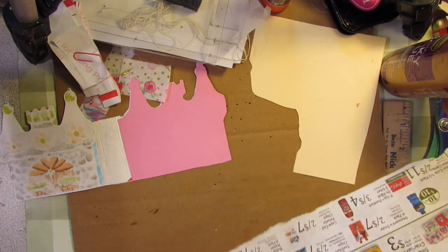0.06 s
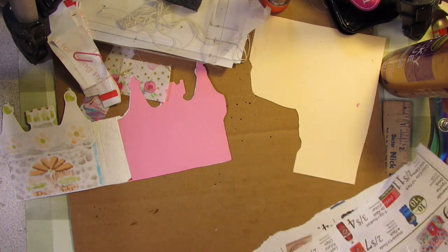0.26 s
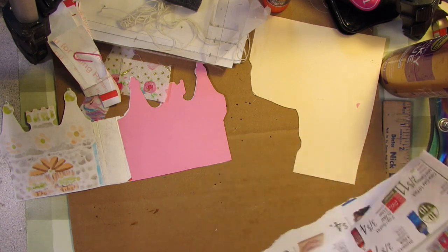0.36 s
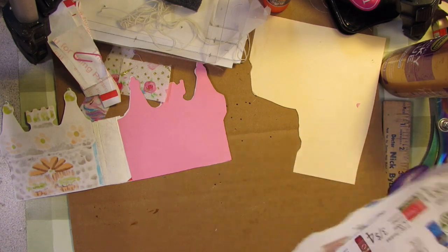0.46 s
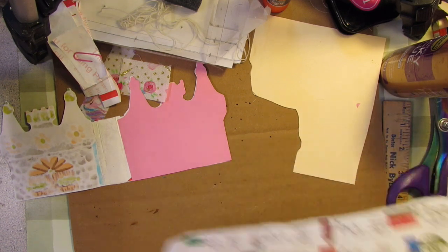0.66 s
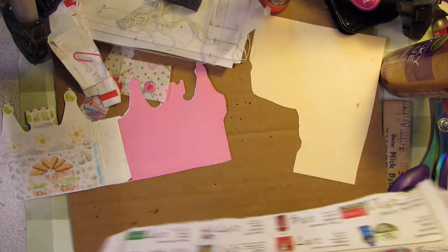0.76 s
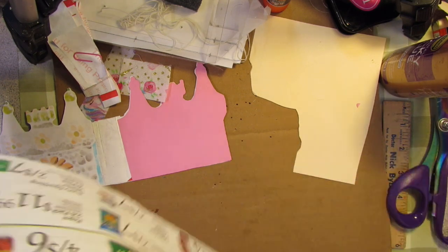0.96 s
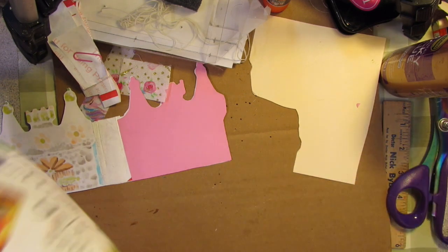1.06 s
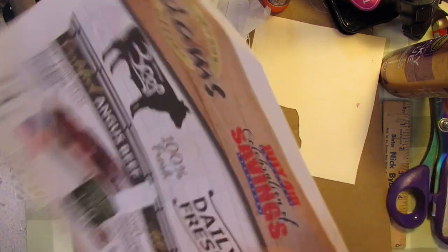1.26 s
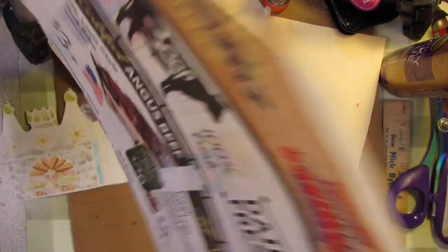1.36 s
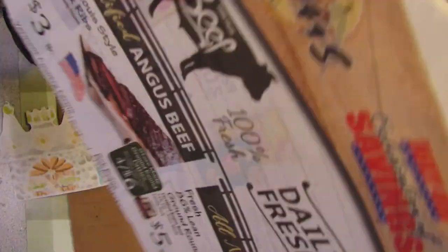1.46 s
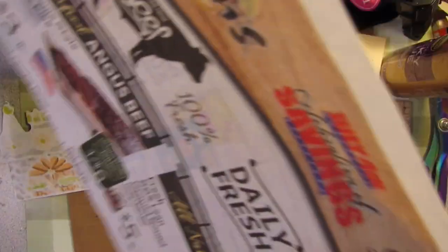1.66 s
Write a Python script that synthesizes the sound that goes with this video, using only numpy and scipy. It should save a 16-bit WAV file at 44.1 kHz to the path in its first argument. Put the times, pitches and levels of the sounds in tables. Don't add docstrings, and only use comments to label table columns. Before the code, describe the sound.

Close, dry paper handling: soft sliding and small creaks first, then crisp snaps, crinkles and low flaps thickening into a dense burst, ending in a few faint ticks over quiet room hiss.

```python
import sys
import numpy as np
from scipy import signal
from scipy.fft import rfft, irfft, next_fast_len
from scipy.io import wavfile

SR = 44100
rng = np.random.default_rng(int(sys.argv[2]) if len(sys.argv) > 2 else 0)


def ratio(d):
    e = np.asarray(d, float) / 20
    return 10 ** e


def log_audio(samples):
    frames = np.atleast_2d(samples).T
    limited = np.clip(frames, -1, 1)
    pcm = np.round(limited * 32767).astype(np.int16)
    wavfile.write(sys.argv[1], SR, pcm)


N = 74970
BUCKLE_RISE_S, BUCKLE_FALL_S = 0.0015, 0.0045


def rms_one(x):
    return x / np.sqrt(np.mean(x ** 2) + 1e-20)


def at_hz(points, hz):
    table_hz, values = np.array(points).T
    return np.interp(np.log(hz), np.log(table_hz), values)


def colour(x, points):
    size = next_fast_len(N + 8192)
    hz = np.arange(size // 2 + 1) * SR / size + 1
    return irfft(rfft(x, size) * ratio(at_hz(points, hz)), size)[..., :N]


def drift(rate_hz):
    r = np.exp(-2 * np.pi * rate_hz / SR)
    wander = signal.lfilter([1], [1, -2 * r, r * r], rng.standard_normal(N + SR))
    return rms_one(wander[SR:])


def band(x, hz, q):
    b, a = signal.iirpeak(hz, q, fs=SR)
    return signal.lfilter(b, a, signal.lfilter(b, a, x))


def high_pass(x, hz):
    return signal.sosfilt(signal.butter(2, hz, "high", fs=SR, output="sos"), x)


def grains(per_s, spread_db):
    sizes = ratio(spread_db * np.minimum(rng.exponential(1, N), 5)) * rng.choice([-1, 1], N)
    return rms_one(sizes * (rng.random(N) < per_s / SR))


def add(out, s, x):
    i = int(s * SR)
    out[i:i + len(x)] += x[:len(out) - i]


def bursts(rows, source, q, rise_s, fall_s, other_db, other_ratio):
    out, t = np.zeros(N), np.arange(6000) / SR
    source = np.concatenate([source, source[:6000]])
    mode_ratios = rng.uniform(0.696, 1.4, (len(rows), 2))
    mode_db, mode_width_hz = -10, 170
    for (s, length, db, hz), ratios in zip(rows, mode_ratios):
        fall = np.exp(-np.maximum(t - length + fall_s / 2, 0) / fall_s)
        gate = np.clip(t / rise_s, 0, 1) * fall
        piece = gate * source[int(s * SR):][:6000]
        panel = rms_one(band(piece, hz, q))
        other = rms_one(band(piece, other_ratio * hz, 1.1))
        modes = sum(rms_one(band(piece, hz * m, hz * m / mode_width_hz)) for m in ratios)
        whole = panel + ratio(other_db) * other + ratio(mode_db) * modes
        add(out, s, ratio(db) * np.sqrt(np.mean(gate ** 2)) * whole)
    return out


def hush():
    # f/Hz, level/dB
    tone_colour = [(30, -55), (100, -11), (300, -3.5), (520, -7), (700, -20.5), (2000, -20), (8000, -26),
                   (16000, -41)]
    # f/Hz, side minus mid level/dB
    tone_width = [(60, 15), (300, 4), (1400, 7.5), (3000, 7), (7000, -21), (15000, 7)]
    mid, side = colour(rng.standard_normal((2, N)), tone_colour)
    level = ratio(-66.5) / np.std(mid)
    return level * (mid + colour(side, tone_width) * [[1], [-1]])


def room(x):
    t60_s, level_db, wall_cut_hz = 0.24, -16, 3500
    tails = rng.standard_normal((2, 12000)) * ratio(-60 * np.arange(12000) / SR / t60_s)
    tails = tails / np.sqrt(np.sum(tails ** 2, axis=1, keepdims=True))
    r = np.exp(-2 * np.pi * wall_cut_hz / SR)
    late = np.pad(signal.lfilter([1 - r], [1, -r], tails), ((0, 0), (250, 0)))
    return ratio(level_db) * signal.fftconvolve(x[None], late, axes=1)[:, :N]


def slide():
    # t/s, level/dB, brightness/(dB per octave)
    strokes = [(0, -59.5, 4), (.042, -71, -1), (0.101, -60.5, 0), (.2, -66.5, 2.5), (.212, -49.5, 0),
               (0.253, -40, 2.5), (0.302, -53, 1.1), (0.441, -50, 0.5), (.55, -59.5, -6), (.7, -42.5, -0.9),
               (.775, -59.5, -4.5), (0.868, -44.5, -1.2), (1.002, -48, 0.5), (1.06, -59.5, -3),
               (1.09, -59.5, -0.5), (1.181, -38.5, 1), (1.271, -54.5, 3.3), (1.345, -78.5, 1)]
    # f/Hz, level/dB
    sheet_colour = [(300, -9.5), (800, -2.5), (2000, 1.5), (5000, 0.5), (9000, -2.5), (13000, -10.5),
                    (16000, -22)]
    s, stroke_db, stroke_tilt = np.transpose(strokes)
    t = np.arange(N) / SR
    db, tilt = np.interp(t, s, stroke_db), np.interp(t, s, stroke_tilt)
    out, shared, patchy_db = 0, drift(25), 3.0
    fibres = [grains(per_s=11000, spread_db=2.5) for _ in range(2)]
    for k, low in enumerate(300 * 2 ** np.arange(0, 6, 0.5)):
        half_octave = signal.butter(2, [low, low * 2 ** 0.5], "band", fs=SR, output="sos")
        part = signal.sosfilt(half_octave, fibres[k % 2])
        bright_db = tilt * np.log2(low / 3400)
        flicker_db = patchy_db * (0.5 * shared + drift(8.8))
        out = out + part * ratio(at_hz(sheet_colour, low * 2 ** 0.26) + bright_db + flicker_db)
    return ratio(db + 6.0) * out


def flaps():
    # t/s, length/s, level/dB, centre f/Hz
    flap_rows = [(.052, 0.012, -58.5, 534), (.22, 0.021, -54.5, 246), (.215, 0.014, -61.5, 102),
                 (.53, 0.03, -61, 145), (.6, 0.036, -59.5, 130), (.78, 0.024, -64, 251),
                 (.94, 0.011, -66, 165), (.43, 0.011, -53.5, 364), (.46, 0.0062, -49.5, 464),
                 (.575, 0.013, -42.5, 304), (.61, 0.028, -46, 298), (.69, 0.037, -48.5, 430),
                 (.815, 0.0085, -35, 407), (.85, 0.035, -52.5, 450), (.875, 0.024, -39, 484),
                 (.99, 0.01, -42, 438), (1.118, 0.0032, -35.5, 500), (1.145, 0.045, -40.5, 341),
                 (1.19, 0.054, -48, 290), (1.288, 0.014, -45, 382)]
    return bursts(flap_rows, rng.standard_normal(N), q=0.76, rise_s=0.004, fall_s=0.018,
                  other_db=-20, other_ratio=0.33)


def swishes(crackle):
    # t/s, length/s, level/dB, centre f/Hz
    swish_rows = [(.07, 0.028, -57, 6150), (.1, 0.042, -56.5, 5870), (.15, 0.039, -66, 7500),
                  (.21, 0.02, -45, 8900), (.239, .025, -54, 6150), (.385, 0.0063, -63, 6200),
                  (.65, .02, -50, 7900), (.681, 0.032, -48, 6200), (1.068, 0.044, -50, 8550),
                  (1.125, .022, -46, 6840), (1.164, .008, -48, 7200), (1.188, 0.014, -39, 6860),
                  (1.24, 0.014, -48, 8500), (1.326, .003, -59.5, 6000), (.49, 0.047, -60.5, 5200),
                  (1.545, 0.0088, -71, 6000)]
    return bursts(swish_rows, crackle, q=1.8, rise_s=BUCKLE_RISE_S, fall_s=BUCKLE_FALL_S,
                  other_db=-6, other_ratio=0.61)


def creaks(crackle):
    # t/s, length/s, level/dB, centre f/Hz
    creak_rows = [(.051, 0.015, -48, 2060), (.064, 0.0052, -49, 2120), (.087, 0.008, -53, 2000),
                  (.105, 0.012, -59, 1790), (.125, 0.0075, -51, 1910), (.14, .015, -68, 1900),
                  (.162, 0.011, -60, 1790), (.174, 0.012, -60, 1780), (.19, 0.013, -63, 1870),
                  (.212, 0.0084, -44.5, 2160), (.224, 0.0064, -47, 1960), (1.081, 0.0064, -42, 1600),
                  (1.266, 0.016, -46.5, 1930), (1.303, 0.026, -58.5, 1700), (1.339, 0.016, -48.5, 1925),
                  (1.36, 0.021, -74, 1850), (1.538, 0.0064, -61.5, 1084), (1.655, 0.032, -58, 1770)]
    return bursts(creak_rows, crackle, q=3.2, rise_s=2 * BUCKLE_RISE_S, fall_s=0.0088,
                  other_db=-22, other_ratio=1.03)


def buckles(crackle):
    # t/s, length/s, level/dB, centre f/Hz
    buckle_rows = [(.24, .02, -37.5, 2124), (.28, 0.0091, -39, 2190), (.381, 0.0096, -43, 1950),
                   (.4262, 0.0021, -59, 2380), (.43, 0.012, -40, 1930), (.458, 0.014, -47.5, 1490),
                   (.512, 0.0082, -51.5, 1470), (.535, 0.012, -50.5, 1500), (.555, .012, -51, 1580),
                   (.572, 0.0062, -38.5, 1300), (.5775, 0.0074, -33, 1350), (.598, 0.017, -37, 1774),
                   (.615, .013, -38.5, 1440), (.64, 0.039, -51, 1530), (.678, 0.0062, -39, 1840),
                   (.694, 0.019, -36.5, 1900), (.72, 0.0067, -47, 1480), (.7825, 0.025, -42.5, 1910),
                   (.813, 0.02, -41, 1690), (.853, 0.011, -39, 1920), (.868, 0.0047, -35, 2590),
                   (.879, 0.0092, -39, 1750), (.895, 0.028, -44, 1300), (.94, 0.014, -41.5, 1850),
                   (.995, 0.029, -47.5, 1630), (1.114, 0.0056, -49, 1980), (1.123, 0.015, -40, 2780),
                   (1.1432, 0.012, -31.5, 1080), (1.1435, 0.0061, -35.5, 2500), (1.156, .006, -43, 1580),
                   (1.163, 0.012, -28.5, 2046), (1.18, 0.017, -33.5, 1980), (1.2, 0.0059, -36, 1465),
                   (1.213, 0.0073, -34.5, 2000), (1.224, 0.0077, -36, 1300), (1.231, 0.0039, -36.5, 2340),
                   (1.24, 0.013, -46.5, 1770), (1.283, 0.006, -45, 1750), (.59, 0.014, -56, 4000)]
    return bursts(buckle_rows, crackle, q=0.85, rise_s=BUCKLE_RISE_S, fall_s=BUCKLE_FALL_S,
                  other_db=-12, other_ratio=2.19)


def rings():
    # t/s, f/Hz, level/dB
    ring_rows = [(.38, 1820, -36), (.38, 4540, -30), (0.3793, 6330, -34), (.428, 980, -35),
                 (0.427, 2490, -26), (.428, 3150, -35), (.428, 3870, -28.5), (0.5316, 3100, -42),
                 (.5325, 4300, -52), (0.8218, 1645, -30), (0.82, 2900, -41), (0.851, 1420, -30),
                 (.852, 2970, -30.5), (0.8758, 1440, -27), (0.8768, 3136, -24), (0.8768, 4000, -32),
                 (.992, 3540, -26), (0.991, 1120, -31), (1.1205, 6830, -31.5), (1.1205, 3770, -30.5),
                 (1.6312, 1095, -42), (1.6321, 1420, -45), (1.6455, 2090, -40), (1.6468, 1510, -38),
                 (1.29, 395, -34.5), (.823, 447, -30.5), (0.052, 550, -50), (1.121, 545, -30)]
    out, t, t60_s = np.zeros(N), np.arange(2500) / SR, 0.018
    for s, hz, db in ring_rows:
        add(out, s, ratio(db - 60 * t / t60_s) * np.sin(2 * np.pi * hz * t))
    return high_pass(out, 350)


def snaps():
    # t/s, peak level/dB, centre f/Hz, treble level/dB, sharpness Q
    snap_rows = [(0.054, -32, 2280, -39, 0.52), (.127, -43.5, 1950, -17, 6.1),
                 (0.232, -28.5, 4200, -7, 1.8), (0.243, -20, 2780, -9, 0.38),
                 (0.281, -22.5, 3130, -33, 0.35), (.38, -19.5, 3970, -40, 1.3),
                 (.428, -15.5, 2770, -39, 0.81), (0.532, -28, 3370, -39, 1.3),
                 (0.6167, -25, 1470, 5.5, 1.2), (0.6776, -16, 2430, -1.5, 0.27),
                 (0.8218, -14.5, 2020, -15, 0.23), (0.8519, -15.5, 1440, 5.5, 0.85),
                 (0.8768, -12, 3240, -7.5, 0.76), (.942, -46, 2800, -17, 1.2),
                 (0.982, -23.5, 1390, 1.5, 1.27), (0.992, -14, 3450, 3, 1.2),
                 (1.1209, -20, 4100, -0.5, 0.93), (1.475, -52.5, 5500, -2, 0.54),
                 (1.54, -48.5, 1090, -4, 0.48), (1.6315, -33.5, 1130, -39, 2.4),
                 (1.6449, -34, 2240, -20, 0.87), (1.684, -47, 2520, -25, 3)]
    t60_s, tail_t60_s, treble_t60_s = 0.017, 0.06, 0.016
    tail_db, splinter_db, splinter_share = -27, -11, 0.25
    out, t = np.zeros(N), np.arange(4000) / SR
    for s, db, hz, treble_db, q in snap_rows:
        noise = rng.standard_normal(4000)
        splinters = noise * (rng.random(4000) < splinter_share)
        crack = ratio(splinter_db - 60 * t / t60_s) * splinters
        crack[0] = -1
        body = band(crack + noise * ratio(tail_db - 60 * t / tail_t60_s), hz, max(q, 0.3))
        treble = band(crack * ratio(-60 * t / treble_t60_s), 6830, 1.3)
        both = body / np.abs(body).max() + ratio(treble_db) * treble / np.abs(treble).max()
        add(out, s, ratio(db) * both / np.abs(both).max())
    return out


def desk(x):
    dip_hz, width_hz, depth = 692, 198, 0.97
    b, a = signal.iirpeak(dip_hz, dip_hz / width_hz, fs=SR)
    return x - depth * signal.lfilter(b, a, x)


def two_ports(paper, creases, around):
    # f/Hz, left minus right level/dB
    port_lean = [(60, 10), (150, 20), (300, 12), (550, 10.5), (1100, 3.5), (2500, 8.5), (15000, 0.5)]
    # f/Hz, level under mid/dB
    port_spread = [(60, -20), (150, -7), (400, -16), (1000, -17.5), (2500, -10.5), (5000, 3.5), (9000, -7),
                   (15000, -1)]
    # f/Hz, side level/dB
    side_dip = [(1400, 0), (1900, -18), (6000, -22), (7500, 0)]
    jumps_hz = 157
    lean_side = [(hz, 20 * np.log10(abs(np.tanh(db * np.log(10) / 40)) + 0.0012)) for hz, db in port_lean]
    low = signal.sosfilt(signal.butter(4, 1200, fs=SR, output="sos"), paper)
    jumping = low * drift(jumps_hz / 10) + (paper - low) * drift(jumps_hz)
    side = colour(paper, lean_side) + colour(jumping, port_spread)
    left, right = around
    side = colour(side + (left - right) / 2, side_dip)
    t = np.arange(N) / SR
    side = side + ratio(-11.5) * creases * (t > 0.39) * (t < 0.56)
    return paper + (left + right) / 2 + side * [[1], [-1]]


def scene():
    crackle = grains(per_s=9000, spread_db=2.6) * ratio(1.8 * drift(180))
    creases = snaps() + rings()
    paper = slide() + flaps() + swishes(crackle) + creaks(crackle) + buckles(crackle) + creases
    paper = desk(high_pass(paper, 87.5))
    return two_ports(paper, creases, room(paper) + hush())


def top_cut(x):
    return signal.sosfilt(signal.butter(12, 16360, fs=SR, output="sos"), x)


def record(dry):
    mix = signal.sosfilt(signal.cheby2(10, 40, 16000, fs=SR, output="sos"), dry)
    return top_cut(mix)


dry = scene()
out = record(dry)
log_audio(out)
```